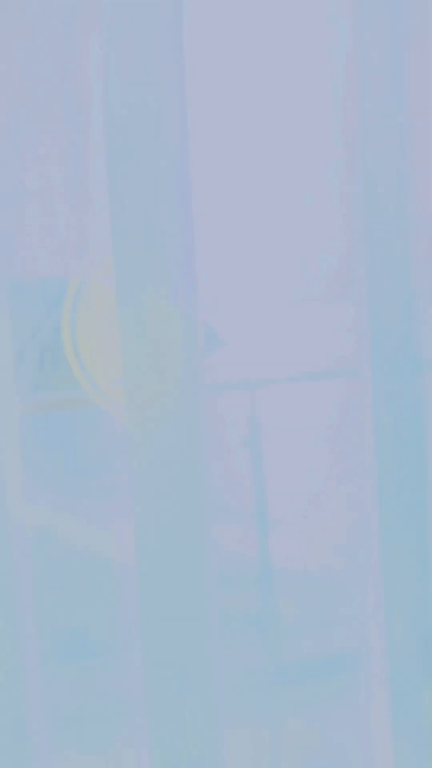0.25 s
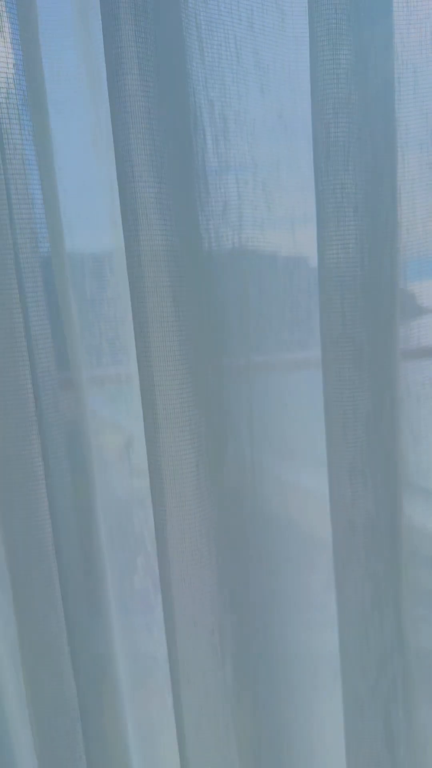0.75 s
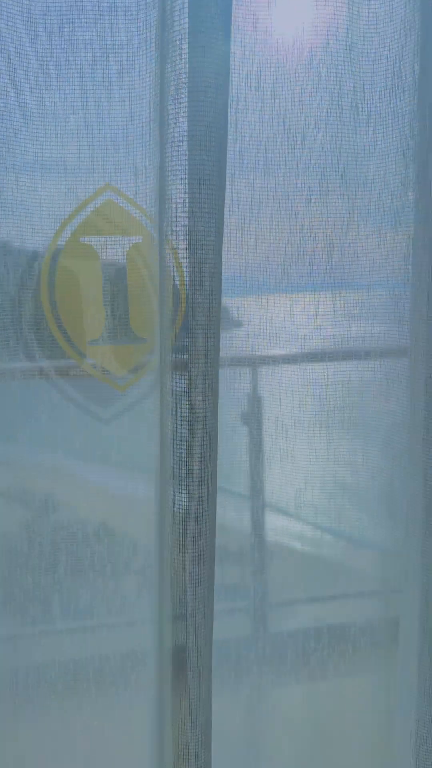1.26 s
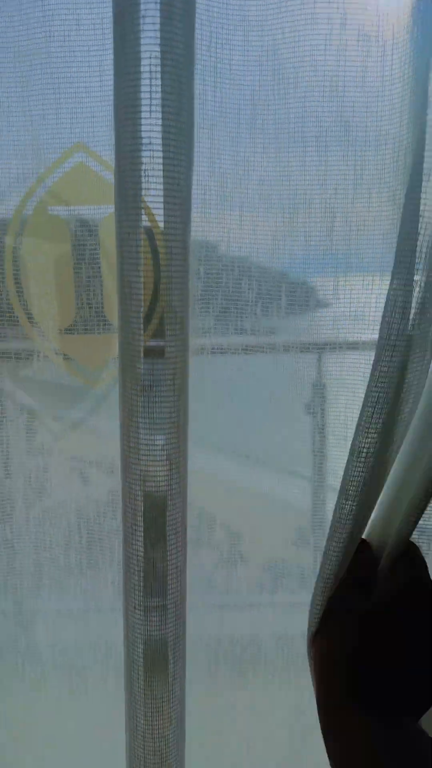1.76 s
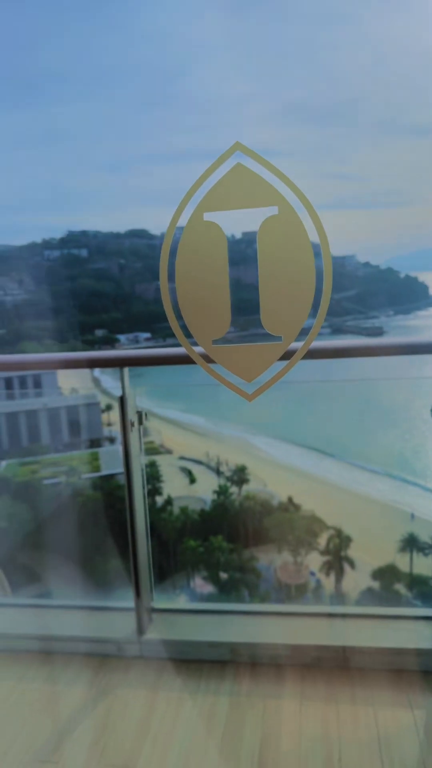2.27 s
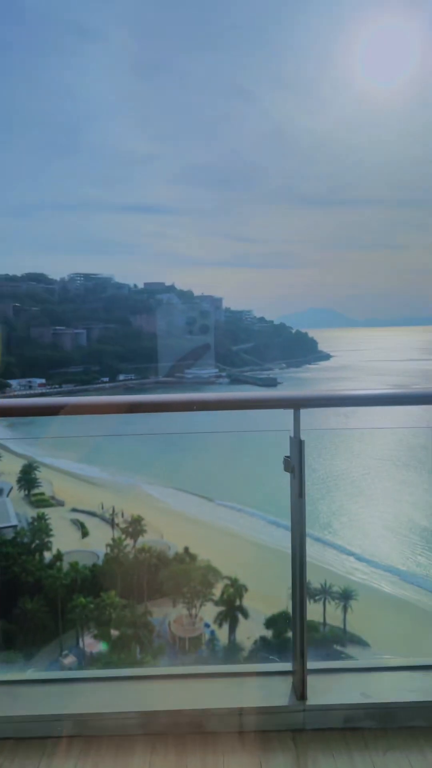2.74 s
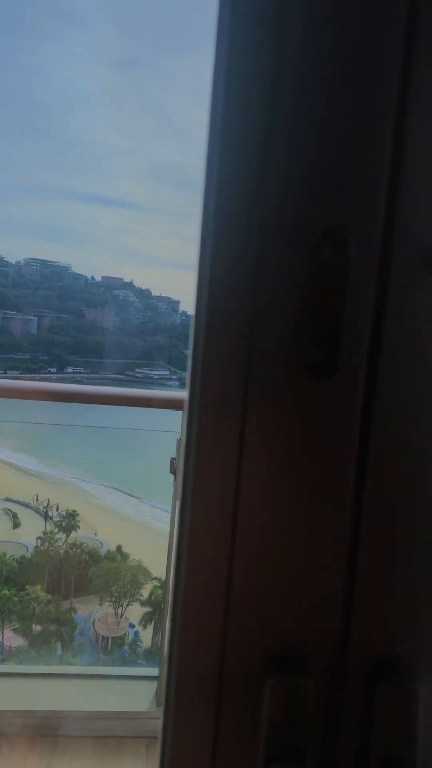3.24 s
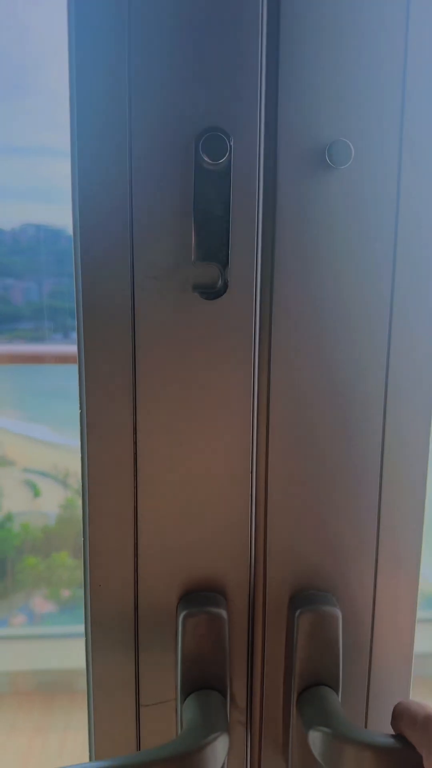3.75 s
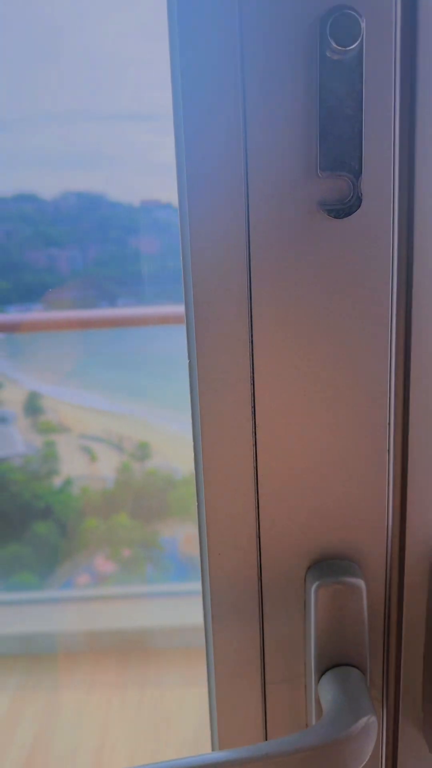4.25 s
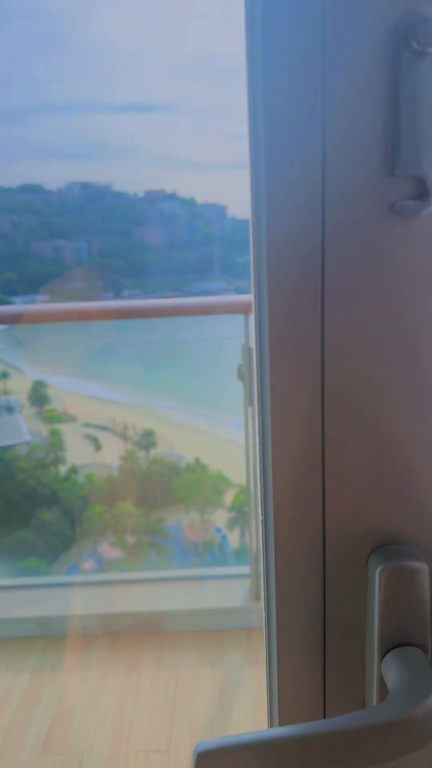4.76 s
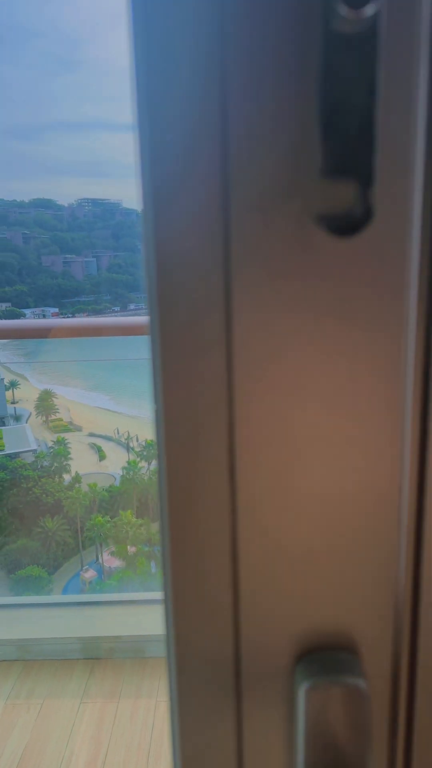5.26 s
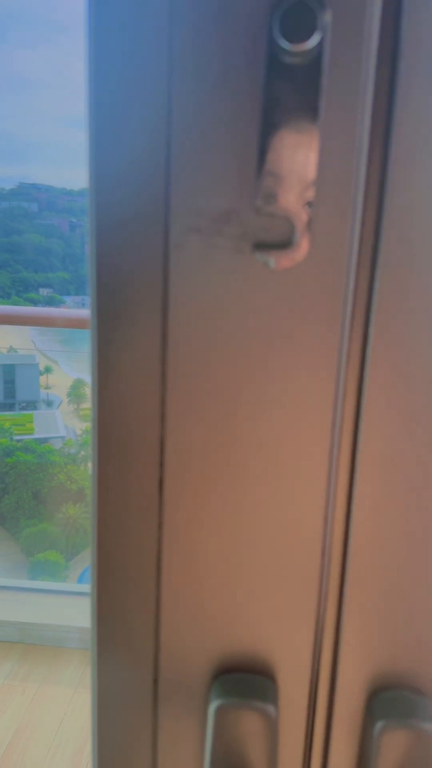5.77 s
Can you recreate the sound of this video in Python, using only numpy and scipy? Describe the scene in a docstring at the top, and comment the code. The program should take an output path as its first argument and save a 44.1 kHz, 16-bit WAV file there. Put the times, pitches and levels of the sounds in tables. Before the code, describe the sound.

A first curtain pull is a soft, airy cloth swish with dull thumps on the phone's body. A second is much louder: a harsh rail scrape with hard clattering gliders. Quiet follows, with faint sleeve rustles and tiny ticks as a hand works a glass door, whose latch snaps sharply twice under a second apart. The microphone is close and handheld, identical in both channels, in a small lightly reverberant room with faint hum.

```python
"""A hotel room, at a hand-held phone: curtains swept along their rail twice, gliders bunching with clacks,
then a hand on the handle and latch of a glass door. Cloth rustles, the grip thumps the phone, the room hums.
Rubbing, handling and room tone are shaped noise under drawn level curves.
Clacks, latch and ticks are chatter bursts through resonances; bolt, door leaf and thumps are damped sines.
One microphone on both channels."""
import sys
import numpy as np
from scipy import signal
from scipy.fft import rfft, irfft, next_fast_len
from scipy.io import wavfile
from scipy.ndimage import uniform_filter1d, map_coordinates

SR = 44100
rng = np.random.default_rng(int(sys.argv[2]) if len(sys.argv) > 2 else 0)


def digitize_waveform(pressure):
    """Quantize a signal to 16-bit integers and store it at the path in sys.argv[1].

    Rows of a 2-D input are taken as channels; values are limited to [-1, 1].
    """
    field = np.atleast_2d(pressure).T
    bounded = np.clip(field, -1, 1)
    quanta = np.round(bounded * 32767).astype(np.int16)
    wavfile.write(sys.argv[1], SR, quanta)


N = 265085

# Room tone spectrum: freq_hz, relative_level_db
ROOM_SPECTRUM = [(13, -56), (22, -7.5), (70, -8.5), (95, 6.5), (165, -19), (223, -3.5), (482, -17.5),
                 (690, -35.5), (1710, -19.5), (3920, -46.5), (7000, -47), (7810, -35.5), (8970, -57),
                 (11500, -44), (16000, -39.5)]
# Faint whines: centre_hz, half_width_hz (to 1/e), level_db (before wavering)
WHINES = [(2720, 47, -80.5), (7780, 130, -82.5)]
# Curtain pulls, one table each: time_s, scrape_db, body_db, hiss_db (before judder)
PULLS = [
    [(0, -54, -52.5, -75), (.13, -48.5, -47, -68.5), (.3, -45, -45, -59.5), (.4, -42.5, -41, -56),
     (.52, -41.5, -40, -53), (.64, -42.5, -41.5, -54.5), (.74, -45, -44.5, -61.5), (.82, -51.5, -52, -69.5),
     (.9, -45.5, -60, -60.5), (.97, -49, -53.5, -61), (1.05, -57, -61, -64.5), (1.14, -64, -75, -70.5),
     (1.3, -80, -75, -101)],
    [(1.55, -79, -72, -73), (1.74, -61, -52, -66.5), (1.78, -48.5, -58, -57.5), (1.85, -50, -48, -62),
     (1.91, -34, -42.5, -47.5), (1.97, -29, -43.5, -48), (2.07, -28.5, -37.5, -44), (2.16, -30, -38, -43.5),
     (2.24, -32.5, -42, -50), (2.32, -44.5, -44, -58.5), (2.4, -50, -52, -62), (2.5, -50, -58, -59.5),
     (2.6, -60, -70, -64.5), (2.78, -57.5, -66, -65.5), (2.86, -64, -72, -84)],
]
# Coarse rub relative to the hiss, one per pull: rub_db. The first pull brushes past the phone.
PULL_RUB_DB = [1.5, -25]
# Faint constant stir: time_s, scrape_db, body_db, hiss_db (before judder)
STIR = [(0, -63, -57.5, -66), (1.3, -62, -54, -68), (1.7, -56, -55.5, -66), (3.0, -59, -56, -70),
        (3.6, -59.5, -55.5, -73), (4.6, -64.5, -56.5, -75), (6.01, -66, -60, -78)]
# Hand and sleeve strokes at the door: start_s, rise_s, hold_s, fall_s,
# scrape_db, body_db, hiss_db, rub_db (hold levels, before judder)
STROKES = [(3.108, 0.068, 0.14, 0.16, -62.5, -55, -57.5, -58), (3.28, .08, .1, 0.12, -60, -63, -59, -62),
           (3.754, 0.28, .08, .08, -58.5, -65, -58, -61.5),
           (4.054, 0.057, 0.031, 0.066, -57, -46.5, -71.5, -75),
           (4.12, 0.043, .03, .06, -78, -67, -63.5, -82), (4.267, 0.083, 0.14, 0.15, -56, -53, -65.5, -78),
           (4.696, 0.19, .01, .1, -63, -75, -65, -73), (4.918, 0.065, 0.016, .06, -49.5, -59, -48, -53.5),
           (4.984, 0.027, 0.19, 0.42, -54.5, -57, -60.5, -64),
           (5.38, .12, .01, 0.075, -58, -77, -67.5, -72.5),
           (5.68, 0.04, 0.037, 0.059, -59.5, -69, -61.5, -66)]
# Rubbing spectra (rail scrape, its low body, cloth hiss, coarse rub): freq_hz, relative_level_db
SCRAPE_SPECTRUM = [(500, -8), (900, -0.5), (1400, -7.5), (1950, 2.5), (2500, -1.5), (3090, 0), (3400, -3.5),
                   (3650, -1), (4250, -6), (4800, -8), (5600, -13), (7000, -20), (9000, -21),
                   (12000, -49.5)]
BODY_SPECTRUM = [(110, -71.5), (180, -9), (214, -12.5), (284, -6.5), (419, -3), (798, -13.5), (860, -15),
                 (1300, -12.5), (1690, -14.5), (2860, -120)]
HISS_SPECTRUM = [(3000, -30.5), (5000, -17.5), (7000, -5.5), (9200, -4), (11000, 0.5), (13000, -2),
                 (15200, -2.5), (16500, -23)]
RUB_SPECTRUM = [(3000, -36), (4300, -1.5), (5500, -3), (7500, -12), (9500, -18)]
# Air and hand loading the microphone: time_s, boom_db, rumble_db (before wobble)
HANDLING_LEVELS = [(0.0, -61, -53), (0.03, -49.5, -43), (0.45, -45.5, -54), (0.5, -47.5, -39),
                   (0.75, -44, -49.5), (1.12, -53.5, -55), (2.09, -47, -58), (2.14, -47, -59),
                   (2.48, -56, -60.5), (4.05, -55.5, -54.5), (4.45, -46.5, -53.5), (4.55, -56.5, -42.5),
                   (4.89, -58.5, -55), (5.09, -44, -47.5), (5.46, -58.5, -55.5), (5.67, -52, -55.5),
                   (5.74, -54.5, -43), (6.01, -60.5, -51)]
# Handling spectra: freq_hz, relative_level_db
BOOM_SPECTRUM = [(70, -36.5), (105, 0.5), (140, 4), (175, 1.5), (215, -13), (300, -41.5)]
RUMBLE_SPECTRUM = [(15, -55.5), (28, -12.5), (42, 0), (62, 6), (105, -6), (150, -52)]
# Grip shifting on the phone: start_s, peak_db, pitch_hz, t60_s
THUMPS = [(0.039, -28.5, 68, 0.075), (0.095, -30, 83.4, 0.077), (0.157, -36, 138, 0.12),
          (0.172, -30, 62.4, 0.08), (0.213, -30.5, 84, 0.051), (0.483, -27, 63, 0.27),
          (0.56, -30, 59.5, 0.21), (0.599, -31, 92, 0.069), (2.035, -29.5, 171, 0.2), (4.1, -44, 265, 0.28),
          (4.557, -43, 68.4, 0.21), (5.741, -32, 51.6, 0.11), (5.799, -34, 46.3, 0.29)]
# Small hard parts touching: start_s, peak_db, pitch_hz, treble_db
TICKS = [(0.103, -28.5, 1590, -22), (0.2568, -33.5, 2000, -9), (1.2087, -36, 1460, -46),
         (1.2498, -40.5, 1630, -40), (1.366, -31.5, 1550, -40), (1.4208, -43.5, 1760, -22),
         (1.493, -42, 1480, -31), (1.574, -42.5, 1670, -28.5), (1.607, -37.5, 1770, -5),
         (2.7202, -40, 2140, 1), (2.752, -45.5, 3500, 2), (2.8079, -41.5, 3450, -16),
         (3.212, -36, 2130, -31), (3.24, -37, 1960, -13), (3.274, -32, 1940, -22),
         (3.2877, -28.5, 1990, -26), (3.2977, -36, 2900, -36), (3.417, -39, 2000, -33),
         (3.7036, -41, 3250, -32), (3.7331, -44.5, 1100, -14), (3.901, -43, 1910, -27),
         (4.683, -36, 1710, -23), (4.6912, -35.5, 1100, -33), (4.7695, -39.5, 2020, -24),
         (5.3186, -38.5, 2230, -15.5), (5.4101, -42, 2920, -29), (5.7194, -41.5, 1510, -11),
         (5.8092, -46.5, 1090, -31), (5.885, -46.5, 4200, 4)]
# Gliders knocking together: start_s, peak_db, chatter_t60_s (at 2200 Hz), treble_db
GLIDERS = [(1.895, -32, .03, -5), (1.9424, -6.5, 0.043, -2), (1.951, -15, 0.014, -8),
           (2.0122, -10, 0.0051, 6), (2.0129, -3, 0.008, 1), (2.016, -7, 0.054, -6.5),
           (2.0727, -6.5, 0.021, -1), (2.079, -13.5, 0.056, -3), (2.102, -25.5, .02, 6.5),
           (2.117, -18, 0.0203, -1), (2.197, -18.5, 0.047, -6), (2.215, -27, 0.0296, 8)]
# Rail resonances: centre_hz, width_hz, relative_level_db (before treble_db)
RAIL_RESONANCES = [(1927, 800, -5), (3120, 570, 2), (4110, 380, 4), (5620, 1700, -5.5), (10880, 2000, 1),
                   (13600, 3200, -2), (15950, 2500, -9)]
# Latch and handle contacts: start_s, peak_db, chatter_t60_s (at 2200 Hz), treble_db,
# low_shelf_db, thud_db (door leaf relative to peak_db)
CONTACTS = [(4.073, -23, 0.059, -6, 15, -37.5), (4.095, -28.5, 0.028, 1, 7, -13),
            (4.3731, -11, 0.012, -4.5, -3.5, -15), (4.3744, -15, 0.085, -6, 0, -21),
            (4.988, -29, .05, 5, 3.5, -14), (5.019, -33.5, 0.018, 8, 20, -17),
            (5.1233, -17, 0.0075, -1.5, -12.5, -40), (5.124, -9.5, 0.037, -0.5, -4.5, -36),
            (5.127, -12, 0.017, 0, -8, -24.5), (5.132, -24.5, 0.026, -2.5, -12, -35)]
# Lock resonances: centre_hz, width_hz, relative_level_db (before treble_db)
LOCK_RESONANCES = [(427, 440, -12.5), (1160, 250, -4.5), (1690, 420, -2), (2076, 245, 4), (2480, 270, 1),
                   (3180, 290, -2.5), (4080, 470, -7), (6360, 2150, -13), (9140, 670, -10.5),
                   (11200, 1900, -12.5), (13840, 1190, -9.5)]
# Bolt and door leaf modes: freq_hz, relative_level_db (before scatter), t60_s
BOLT_MODES = [(1970, -4, 0.12), (2072, -4, 0.14), (2235, 7, 0.094), (2350, 0, 0.12), (3150, -3, 0.09)]
DOOR_MODES = [(110.4, -1, 0.39), (296, -3.5, 0.18), (477, -2.5, 0.064)]
# Decay of the room's answer: freq_hz, t60_s
WALL_DECAY = [(200, 1), (2200, 0.398), (5000, 0.26), (14000, 0.2)]

ROOM_TONE_DB = -54.5
STIR_RUB_DB = -5.5  # coarse rub relative to the hiss
STROKE_EDGE_DB = -26.5  # stroke start and end relative to its hold
TICK_T60_S = 0.04  # at 2200 Hz
BOLT_DB = -17.5  # bolt ring relative to the contact
TOP_HZ = 15900  # phone band limit


def amp(db):
    """Gain of a level in dB."""
    return 10 ** (np.asarray(db) / 20)


def unit(x):
    """x at rms 1."""
    return x / np.sqrt(np.mean(x ** 2) + 1e-20)


def along(points, hz):
    """Interpolate (Hz, value) points on a log frequency axis."""
    point_hz, value = np.transpose(points)
    return np.interp(np.log(hz + 1), np.log(point_hz + 1), value)


def wobble(rate_hz):
    """Smooth random curve with rate_hz knots a second."""
    knots = rng.standard_normal(int(N * rate_hz / SR) + 4)
    return map_coordinates(knots, [np.arange(N) * rate_hz / SR])


def filtered(x, response):
    """x times a response of frequency."""
    size = next_fast_len(N + SR // 2)
    gain = response(np.fft.rfftfreq(size, 1 / SR))
    return irfft(rfft(x, size) * gain, size)[..., :N]


def rush(spectrum, patchy_db, grain_db=0, grain_hz=400):
    """Coloured noise of rms 1 with time-frequency patches of random gain and fast grain."""
    z = signal.stft(rng.standard_normal(N + 512), nperseg=512)[2]
    field = uniform_filter1d(rng.standard_normal(z.shape), 6, 0)
    field = uniform_filter1d(field, 10, 1)
    noise = signal.istft(z * amp(patchy_db * unit(field)), nperseg=512)[1][:N]
    grainy = noise * amp(grain_db * wobble(grain_hz))
    return unit(filtered(grainy, lambda hz: amp(along(spectrum, hz))))


def room_tone():
    """Ventilation hum and hiss with two faint whines: narrow noise bands of wavering level."""
    tone = amp(ROOM_TONE_DB) * rush(ROOM_SPECTRUM, patchy_db=5.0)
    for centre_hz, width_hz, db in WHINES:
        noise = rng.standard_normal(N)
        whine = unit(filtered(noise, lambda hz: np.exp(-((hz - centre_hz) / width_hz) ** 2)))
        tone = tone + amp(db + 2 * wobble(5.6)) * whine
    return tone


def curves(rows, outside_db=None):
    """One value per sample for each column after the time; end values hold unless outside_db is given."""
    s, *columns = np.transpose(rows)
    t = np.arange(N) / SR
    return [np.interp(t, s, column, outside_db, outside_db) for column in columns]


def effort():
    """Gains of scrape, body, hiss and rub: pulls, stir and strokes add as powers."""
    parts = []
    for rows, rub_db in zip(PULLS + [STIR], PULL_RUB_DB + [STIR_RUB_DB]):
        hiss_db = np.array(rows)[:, 3]
        parts.append(amp(curves(np.c_[rows, hiss_db + rub_db], outside_db=-200)))
    for s, rise, hold, fall, *levels_db in STROKES:
        corners_s = s + np.cumsum([0, rise, hold, fall])
        corners_db = np.add.outer([STROKE_EDGE_DB, 0, 0, STROKE_EDGE_DB], levels_db)
        parts.append(amp(curves(np.c_[corners_s, corners_db], outside_db=-200)))
    return np.sqrt(np.sum(np.square(parts), axis=0))


def rubbing():
    """Gliders scrape the rail and cloth hisses: noise layers under one shared stick-slip judder."""
    scrape, body, hiss, rub = effort()
    judder = wobble(25.15)
    scrape = scrape * amp(0.51 * judder) * rush(SCRAPE_SPECTRUM, patchy_db=2.0, grain_db=1.0, grain_hz=280)
    body = body * amp(0.6 * judder) * rush(BODY_SPECTRUM, patchy_db=1.6, grain_db=1.5, grain_hz=200)
    hiss = hiss * amp(0.6 * judder) * rush(HISS_SPECTRUM, patchy_db=0.5, grain_db=2.0, grain_hz=1700)
    rub = rub * amp(0.45 * judder) * rush(RUB_SPECTRUM, patchy_db=1.0, grain_db=2.0, grain_hz=740)
    return scrape + body + hiss + rub


def handling():
    """Air and hand load the microphone: boom and rumble noise of wobbling level."""
    boom_db, rumble_db = curves(HANDLING_LEVELS)
    boom = amp(boom_db + 0.96 * wobble(9)) * rush(BOOM_SPECTRUM, patchy_db=0.2)
    rumble = amp(rumble_db + 1.16 * wobble(9)) * rush(RUMBLE_SPECTRUM, patchy_db=0.5)
    return boom + rumble


def add(track, s, sound):
    """Mix a sound in at time s."""
    track[round(s * SR):][:len(sound)] += sound


def ring(modes, scatter_db, attack_s=0.00072):
    """One blow: damped modes at random strengths and phases, peak 1."""
    t = np.arange(SR // 2) / SR
    x = np.zeros(len(t))
    for hz, db, t60 in modes:
        strength, phase = rng.standard_normal(2)
        decay = amp(db + scatter_db * strength - 60 * t / t60)
        x += decay * np.sin(2 * np.pi * hz * t + phase)
    x = x * (1 - np.exp(-t / attack_s))
    return x / np.abs(x).max()


def thumps():
    """Soft low pushes through the phone's case: a damped sine and one shorter overtone."""
    out = np.zeros(N + SR)
    for s, db, hz, t60 in THUMPS:
        modes = [(hz, 0, t60), (2.22 * hz, -9, 0.56 * t60)]
        add(out, s, amp(db) * ring(modes, scatter_db=0.5, attack_s=0.0025))
    return out[:N]


def knock(resonances, t60, treble_db, low_shelf_db=0):
    """A first blow and a dying burst of contact chatter through broad resonances, peak 1."""
    size = SR // 4
    t, f = np.arange(size) / SR, np.fft.rfftfreq(size, 1 / SR)
    contact, spectrum = rng.standard_normal(size), 0
    contact[0] = 4.5  # the first blow
    for k, (centre, width, db) in enumerate(resonances):
        # treble chatter dies sooner
        chatter_t60 = max(t60, 0.003) * (2200 / centre) ** 0.49
        chatter = contact * amp(-60 * t / chatter_t60)
        gain = (-1) ** k * amp(db + treble_db * (centre > 7000))
        bandpass = 1j * f * width / (centre ** 2 - f ** 2 + 1j * f * width)
        spectrum = spectrum + rfft(chatter) * gain * bandpass
    # a heavier contact drives more of the low modes
    shelf = (1j * f + 1600 * amp(low_shelf_db / 2)) / (1j * f + 1600)
    x = irfft(spectrum * shelf ** 2, size)
    return x / np.abs(x).max()


def ticks():
    """Small hard parts touching: a blunt pitch, two upper resonances and some treble."""
    out = np.zeros(N + SR)
    for s, db, hz, treble_db in TICKS:
        # centre_hz, width_hz, relative_level_db
        shape = [(hz, 0.095 * hz, 0), (1.59 * hz, 0.21 * hz, -7), (2.1 * hz, 0.1 * hz, -9), (9000, 7000, -4.5)]
        add(out, s, amp(db) * knock(shape, TICK_T60_S, treble_db))
    return out[:N]


def gliders():
    """Gliders clack together, each contact chattering into the rail's resonances."""
    out = np.zeros(N + SR)
    for s, db, t60, treble_db in GLIDERS:
        add(out, s, amp(db) * knock(RAIL_RESONANCES, t60, treble_db))
    return out[:N]


def latch():
    """Each contact chatters into the lock, rings the bolt and thuds the door leaf."""
    out = np.zeros(N + SR)
    for s, db, t60, treble_db, low_shelf_db, thud_db in CONTACTS:
        add(out, s, amp(db) * knock(LOCK_RESONANCES, t60, treble_db, low_shelf_db))
        add(out, s, amp(db + BOLT_DB) * ring(BOLT_MODES, scatter_db=2.5))
        add(out, s, amp(db + thud_db) * ring(DOOR_MODES, scatter_db=5.0, attack_s=0.0011))
    return out[:N]


def walls(x):
    """The room's answer: a noise tail of unit energy, each frequency dying at its own speed."""
    hz, t, z = signal.stft(rng.standard_normal(SR // 2), SR, nperseg=256)
    decay = amp(-60 * t / along(WALL_DECAY, hz)[:, None])
    tail = signal.istft(z * decay, SR, nperseg=256)[1]
    delayed = np.pad(x, (300, 0))  # samples
    return signal.fftconvolve(delayed, tail / np.linalg.norm(tail))[:N]


def scene():
    """One microphone, copied to both channels; only the hits are answered by the walls."""
    small, rail, lock = ticks(), gliders(), latch()
    hits = small + amp(-9) * walls(small)
    hits = hits + rail + amp(-7) * walls(rail)
    hits = hits + lock + amp(-14.5) * walls(lock)
    return np.tile(room_tone() + rubbing() + handling() + thumps() + hits, (2, 1))


def record(dry):
    """The phone keeps nothing above its band limit."""
    return filtered(dry, lambda hz: hz < TOP_HZ)


dry = scene()
out = record(dry)
digitize_waveform(out)
```